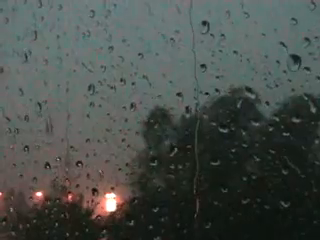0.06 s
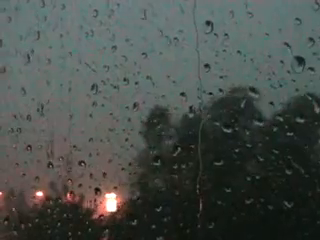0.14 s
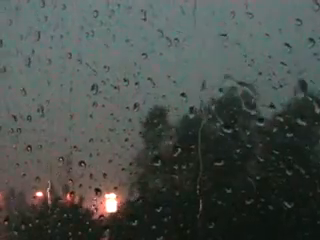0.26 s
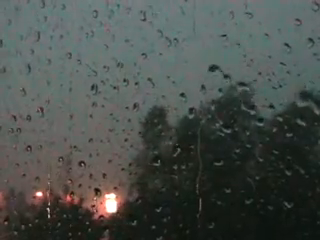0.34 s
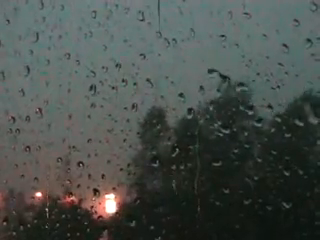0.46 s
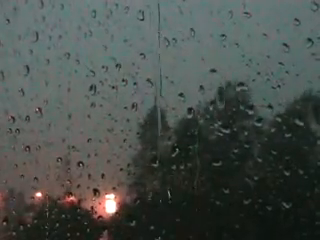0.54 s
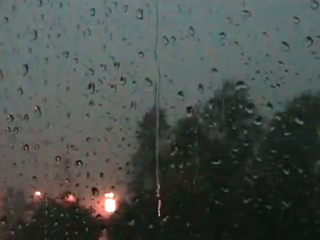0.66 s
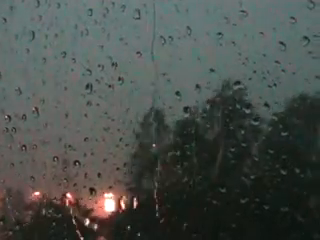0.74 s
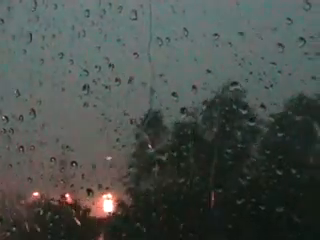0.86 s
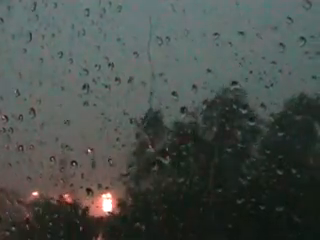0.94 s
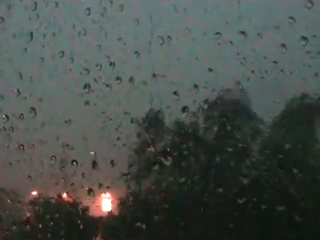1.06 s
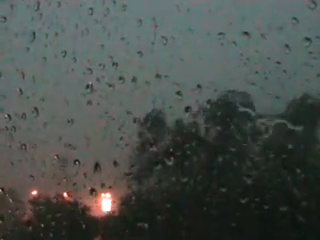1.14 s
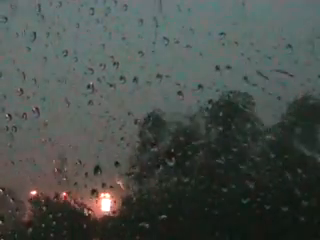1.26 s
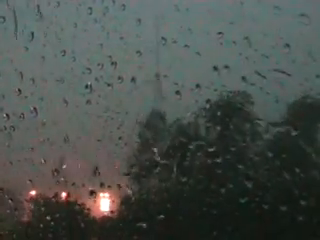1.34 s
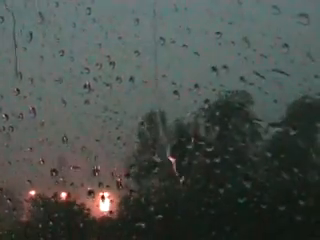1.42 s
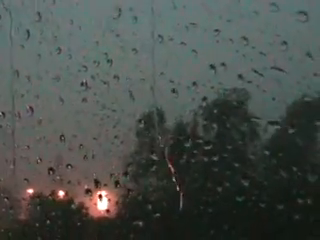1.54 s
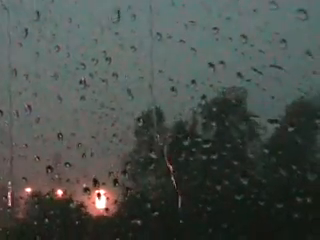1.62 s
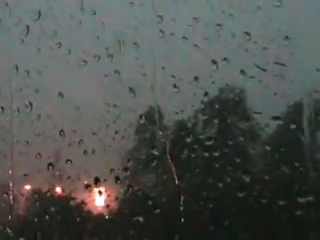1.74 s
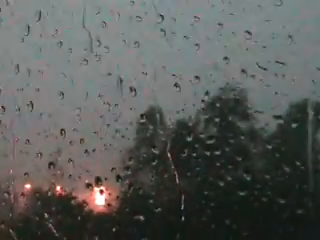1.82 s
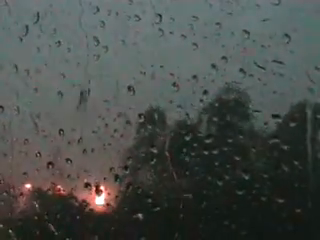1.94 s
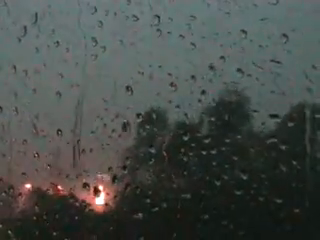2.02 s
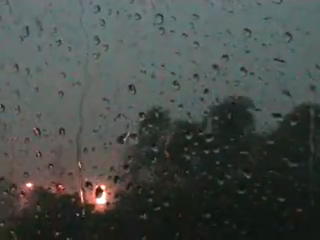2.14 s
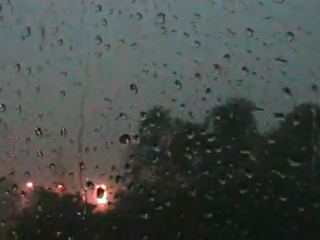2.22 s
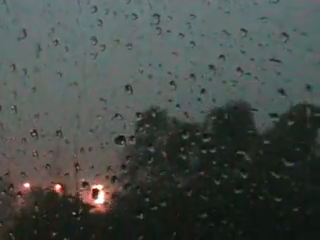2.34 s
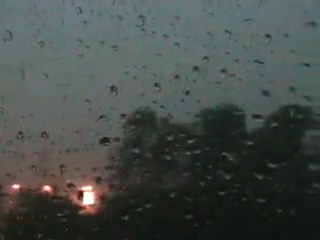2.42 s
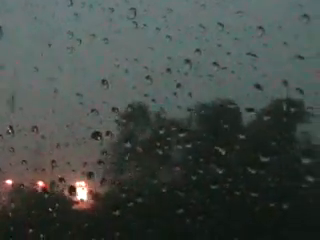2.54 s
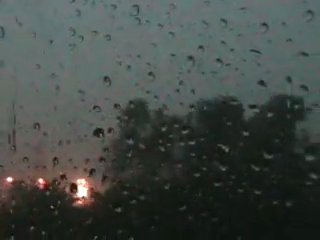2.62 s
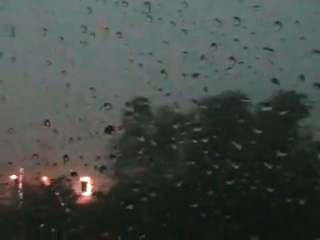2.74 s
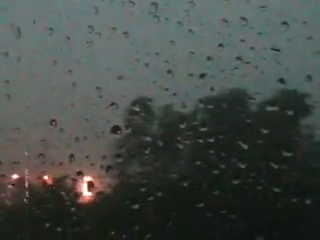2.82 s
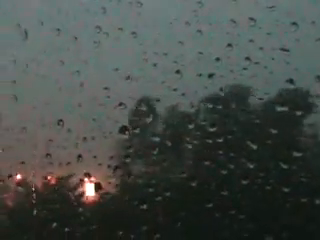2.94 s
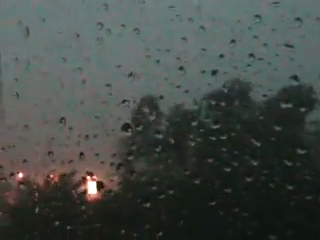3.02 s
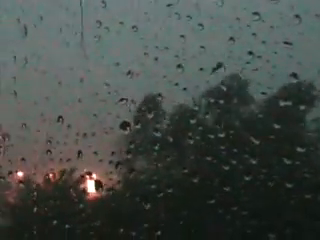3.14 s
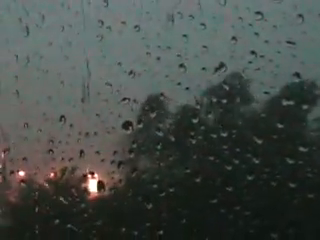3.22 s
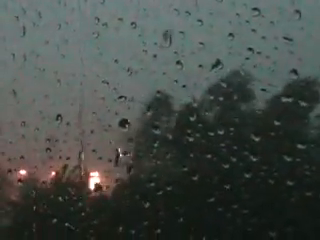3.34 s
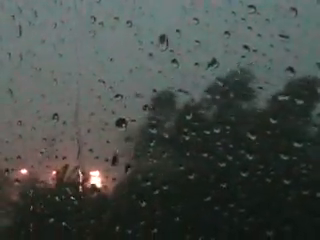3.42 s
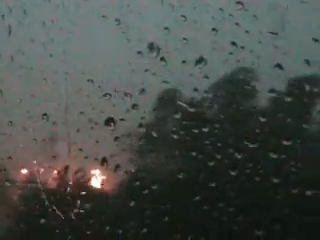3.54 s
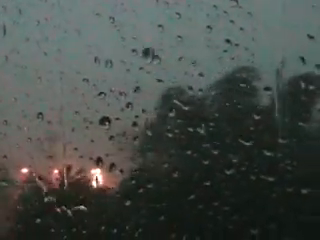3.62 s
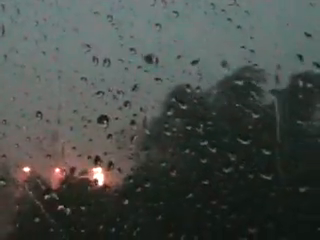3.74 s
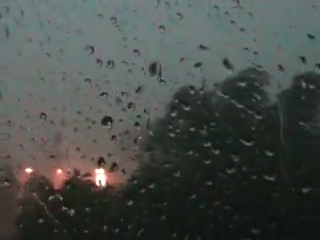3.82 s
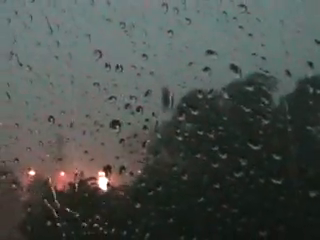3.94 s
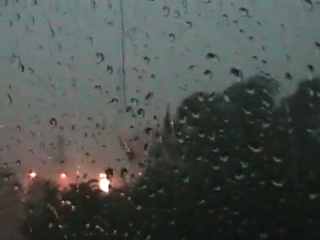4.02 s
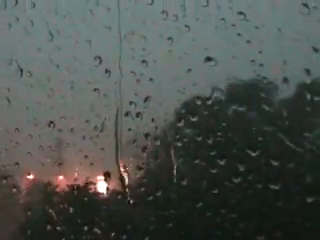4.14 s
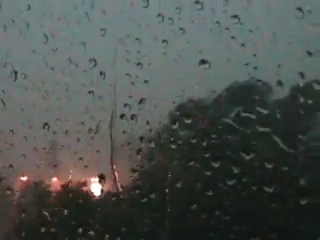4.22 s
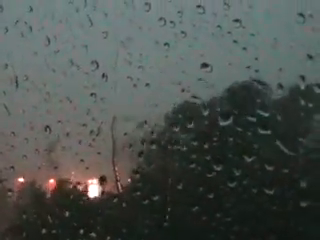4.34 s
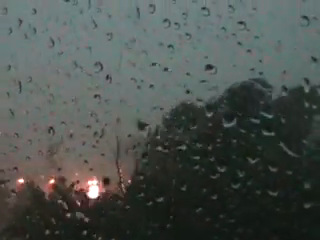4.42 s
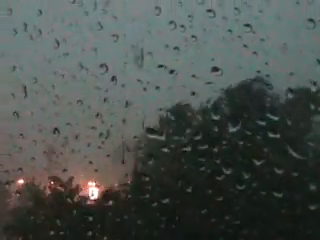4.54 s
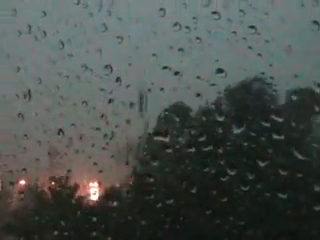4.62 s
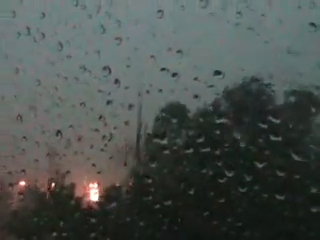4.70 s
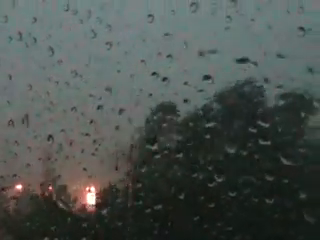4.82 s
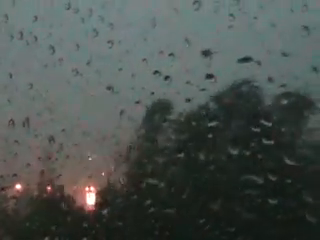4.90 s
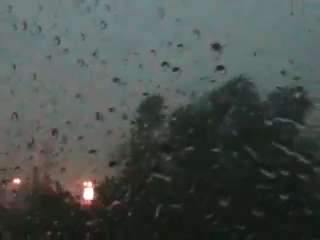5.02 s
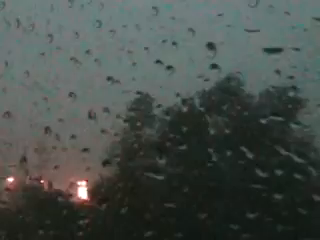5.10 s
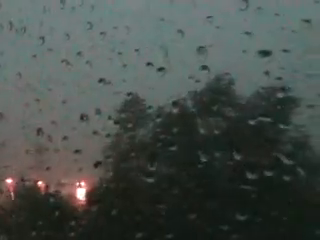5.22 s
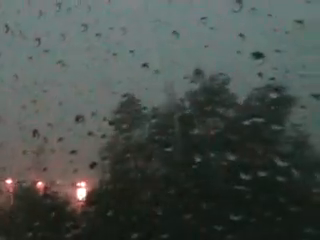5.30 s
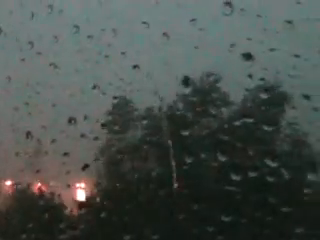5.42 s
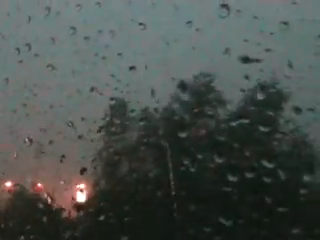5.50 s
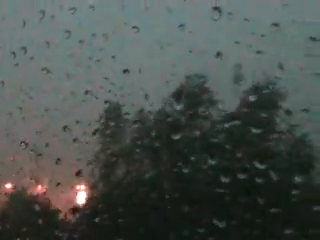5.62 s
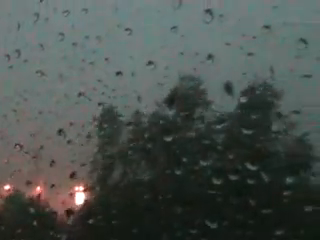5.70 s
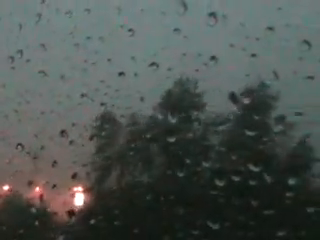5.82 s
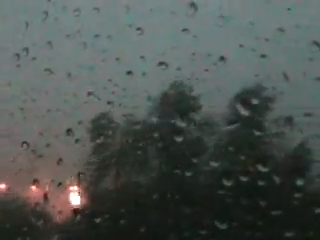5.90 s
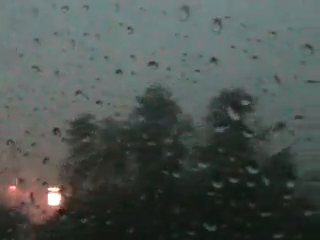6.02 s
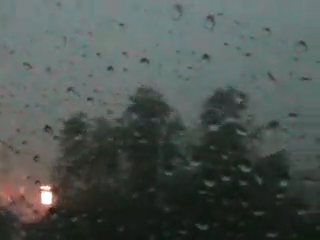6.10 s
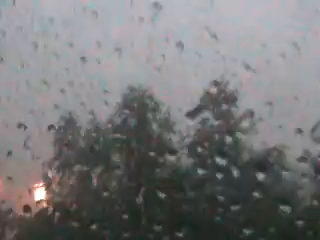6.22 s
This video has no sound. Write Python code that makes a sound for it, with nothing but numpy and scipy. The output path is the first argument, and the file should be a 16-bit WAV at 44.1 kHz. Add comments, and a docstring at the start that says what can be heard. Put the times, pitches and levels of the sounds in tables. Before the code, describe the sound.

Heard from inside a small room behind a closed window: a steady muffled gale roar with low rumble and boom. Rain starts thin, then gusts throw sheets of noisy patter on the glass with a few fat drops. After a brief lull, the squall swells and heavy drops click, knock and spatter hard on the pane, loudest at the very end.

```python
"""A gale with heavy rain, heard from behind a closed window.
From the start filtered noise roars through the walls and booms and hums in the small room.
The rain starts thin and soon fills in: gusts throw sheets of noisy patter at the glass, with a few fat drops.
Towards the end the squall grows, and fat drops smack on the pane: a click, a knock of ringing tones
and a bright burst of spatter."""
import sys
import numpy as np
from scipy import signal
from scipy.fft import rfft, irfft, next_fast_len
from scipy.io import wavfile
from scipy.ndimage import uniform_filter1d, map_coordinates

SR = 44100
rng = np.random.default_rng(int(sys.argv[2]) if len(sys.argv) > 2 else 0)


def transcribe(signal):
    """Save signal, clipped to [-1, 1], as a 16-bit WAV file at the path in sys.argv[1]."""
    frames = np.atleast_2d(signal).T
    limited = np.clip(frames, -1, 1)
    pcm = np.round(limited * 32767).astype(np.int16)
    wavfile.write(sys.argv[1], SR, pcm)


N = 276056  # length in samples

# Gusts that throw rain at the window.
# Each row: crest in seconds, rise in seconds, hold in seconds, strength in dB over the lulls.
GUSTS = [(0.71, 0.11, 0.12, 4.5), (1.193, 0.16, 0.075, 8.5), (1.33, 0.14, 0.07, 6), (1.5, 0.11, 0.025, 5.5),
         (1.776, 0.18, 0.18, 4.5), (2.136, .1, 0.12, 2), (2.687, 0.11, .02, 4), (2.99, 0.17, 0.14, 6),
         (3.23, .1, .04, 4.3), (3.505, 0.12, 0.094, 2.5), (4.374, 0.1, 0.074, 1), (4.865, 0.14, 0.21, 10.3),
         (5.055, 0.32, 0.31, 11), (5.495, 0.4, 0.098, 12), (5.909, 0.43, 0.07, 11.5),
         (6.19, 0.26, 0.075, 16.5)]
# Swell of the gale under the gusts. Each row: time in seconds, then levels of roar, hum and boom in dB.
GALE_LEVELS = [(0, -30.5, -37.5, -43.5), (.5, -30, -42, -36.5), (.8, -31.5, -37, -37.5),
               (1.0, -33, -40.5, -36.5), (1.15, -28, -37, -37.5), (1.37, -32, -37.5, -37.5),
               (1.65, -31, -41.5, -42.5), (2.05, -31.5, -42, -36), (2.4, -32, -40, -43),
               (2.52, -29, -41.5, -41), (2.8, -29.5, -43, -36), (3.05, -29, -39.5, -38.5),
               (3.45, -30, -38, -39.5), (3.78, -28.5, -38.5, -39), (4.25, -32, -40.5, -40.5),
               (4.68, -31, -40, -41.5), (4.9, -31, -34.5, -41), (5.0, -35, -29.5, -39),
               (5.45, -31, -37.5, -41.5), (5.72, -33, -40, -40), (5.85, -29, -42, -49),
               (6.05, -32.5, -35, -39), (6.15, -30, -31, -33), (6.25, -27, -38, -39)]
# Buffeting on the building. Each row: time in seconds, level in dB.
RUMBLE_LEVELS = [(0, -42.5), (1.2, -46.5), (2.3, -42), (3.1, -45), (4.5, -40), (5.1, -44), (5.8, -38),
                 (6.2, -41.5)]
# Tone colour of the roar, the rumble, the sheets of rain and the fine spray.
# Each row: frequency in Hz, relative level in dB.
ROAR_COLOUR = [(60, -48), (150, -9), (235, -5.5), (340, -2), (520, -2), (700, -5), (790, -5), (880, -2),
               (1200, -11), (1700, -15), (3000, -35), (8000, -64)]
RUMBLE_COLOUR = [(10, -9), (26, -3), (40, -11), (54, 4), (62, -7), (71, 3), (84, -7.5), (110, -4),
                 (200, -10.5), (500, -31), (1500, -37)]
SHEET_COLOUR = [(200, -35), (600, 6), (1000, 4.5), (1600, 0), (2300, 3), (2900, -2.5), (3800, -6.5),
                (5200, -16.5), (9000, -56)]
SPRAY_COLOUR = [(1500, -17), (3500, 0), (5000, -0.5), (5700, 0), (6600, 1.6), (8000, -2.5), (9400, -7),
                (10300, -10), (11200, -78)]
# Resonances of the walls, and of the room for its boom and its hum.
# Each row: frequency in Hz, width in Hz, relative level in dB.
WALL_MODES = [(439, 26, -4), (562.6, 32, -0.6), (695, 48, -3.5), (1067, 95, -13), (1296, 38, -9.5)]
BOOM_MODES = [(198.7, 15, 1.5), (239, 28, -1.5), (280, 24, 0.5), (344, 98, -7.5)]
HUM_MODES = [(125.5, 13, -10.5), (157.6, 7.9, -1)]
# Left-right likeness. Each row: frequency in Hz, likeness (1 same, 0 unrelated, -1 opposite).
ALIKE = [(130, 0.42), (260, 0.78), (550, 0.92), (1200, 0.91), (2400, 0.88), (5000, 0.85), (7500, 0.84),
         (10000, 0.022)]
RUMBLE_ALIKE = [(40, -0.9), (90, -0.42), (200, -0.85)]
# Fat drops on the pane. Each row: start in seconds, level in dB, centre of the splash in Hz,
# time in seconds for the splash to fall by 60 dB.
DROPS = [(.352, -46, 6000, 0.055), (.501, -44, 6460, .04), (.699, -42, 7000, 0.036), (.705, -40, 1880, .1),
         (.954, -41, 3600, 0.026), (2.686, -29, 2060, .08), (2.81, -44, 7400, .04),
         (2.834, -40, 4100, 0.037), (2.984, -41, 5870, 0.039), (3.041, -27, 2670, 0.035),
         (3.185, -39, 4000, 0.036), (3.512, -34.5, 2980, 0.059), (3.522, -45, 7000, 0.036),
         (3.803, -38.5, 3140, .04), (4.35, -45, 4000, .06), (4.849, -32, 5500, 0.026),
         (4.868, -43, 6000, .03), (4.912, -47, 7000, 0.027), (4.949, -33, 4600, .04),
         (5.123, -32, 6000, .06), (5.127, -22.5, 3000, 0.036), (5.272, -30.5, 3300, .04),
         (5.32, -28, 3300, 0.047), (5.392, -28, 4170, 0.044), (5.532, -32, 4600, 0.031),
         (5.58, -33, 2300, 0.036), (5.896, -26, 3500, 0.039), (6.1212, -30, 5140, .06),
         (6.2085, -16.5, 2500, 0.039), (6.226, -28, 1700, 0.043)]
# Hard smacks that shake the whole pane.
# Each row: start in seconds, then levels of knock, snap and spatter in dB.
SMACKS = [(5.123, -16, -18, -29), (5.896, -26, -24, -30), (6.1185, -17, -5, -40), (6.2068, -6, -12, -17.5)]
# Bright resonances that the spatter excites; their response is squared when used.
# Each row: frequency in Hz, width in Hz, relative level in dB (both before squaring).
SPATTER_MODES = [(5150, 550, 0), (7300, 700, -2), (8800, 650, -1.5), (10000, 500, -7)]
# Ringing tones of the pane.
# Each row: frequency in Hz, relative level in dB, time in seconds to fall by 60 dB.
PANE_MODES = [(227, -7, 0.27), (486, -5, 0.098), (716, 2, 0.019), (930, 5.5, 0.033), (1860, -5, 0.02),
              (2970, 2, 0.012)]

RELEASE_S = 0.46  # time constant with which a very faint gust ebbs
RELEASE_SHRINK_PER_DB = 0.24  # stronger gusts ebb sooner
# How far each layer follows the gusts, in dB per dB of gust
ROAR_GROWS, BOOM_GROWS, RUMBLE_GROWS, SHEET_GROWS, SPRAY_GROWS = 0.41, 0.64, 0.28, 1.092, 0.91
BOOM_LAG_S = 0.052  # the boom trails the rain
ROAR_WAVER_DB, BOOM_WAVER_DB, RUMBLE_WAVER_DB, FLURRY_DB = 0.8, 1.1, 1.6, 0.65  # random level changes
SHOWER_START_DB, SHOWER_BUILD_S = -2.5, 0.76  # the rain starts thin; time constant of filling in
SHEET_DB, SPRAY_DB = -40.5, -52.5  # levels in the lulls, once the rain has filled in
SPLASH_WIDTH = 1.0  # width of a splash resonance over its centre frequency, before squaring
SPATTER_HOLD_S, SPATTER_T60_S = 0.0021, 0.012  # burst length, then time to fall by 60 dB
SPATTER_ROOM_DB = -8  # room answer to the spatter
SPATTER_LEFT_DB = 2  # raises the left and lowers the right
SNAP_LOW_HZ, SNAP_HIGH_HZ = 1900, 6000  # band of the snap of a hard smack
KNOCK_LAG_S = 0.00195  # the frame gives way just after the glass is struck
TOP_HZ = 11100  # nothing is kept from here up


def amp(db):
    """Turn decibels into a gain."""
    return 10 ** (np.asarray(db) / 20)


def unit(x):
    """Scale to rms 1."""
    return x / np.sqrt(np.mean(x ** 2) + 1e-20)


def along(points, hz):
    """Read values between (Hz, value) points on a log frequency axis."""
    f, v = np.transpose(points)
    return np.interp(np.log(hz + 1), np.log(f + 1), v)


def curves(rows):
    """Give one value per sample for each column after the time."""
    s, *cols = np.transpose(rows)
    return [np.interp(np.arange(N) / SR, s, c) for c in cols]


def wobble(rate):
    """Draw a smooth random curve with this many knots a second."""
    return map_coordinates(rng.standard_normal(512), [np.arange(N) * rate / SR], mode="mirror")


def filtered(x, response):
    """Multiply the spectrum of x by a response that depends on frequency."""
    n = x.shape[-1]
    m = next_fast_len(n + 8192)  # spare room for the filter's tail
    return irfft(rfft(x, m) * response(np.fft.rfftfreq(m, 1 / SR)), m)[..., :n]


def resonance(f, centre, width):
    """Response of one damped vibration, strongest at its centre frequency."""
    return 1j * f * width / (centre ** 2 - f * f + 1j * f * width)


def peaks(modes, f):
    """Gain of several resonances whose powers add up."""
    return np.sqrt(sum(np.abs(amp(db) * resonance(f, hz, width)) ** 2 for hz, width, db in modes))


def spread(pair, colour, alike):
    """Turn two unrelated signals into a coloured, partly alike left and right of rms 1."""
    def mid_and_side(f):
        turn = np.arccos(np.clip(along(alike, f), -.98, .98)) / 2
        return colour(f) * np.array([np.cos(turn), np.sin(turn)])
    mid, side = filtered(pair, mid_and_side)
    return unit(np.array([mid + side, mid - side]))


def noise(length=N):
    """Two unrelated white noises."""
    return rng.standard_normal((2, length))


def gust():
    """Wind strength in dB over the lulls: each gust rises, holds and ebbs, and the strongest prevails."""
    t = np.arange(N) / SR
    strength = np.zeros(N)
    for s, rise_s, hold_s, db in GUSTS:
        release_s = RELEASE_S * np.exp(-RELEASE_SHRINK_PER_DB * db)
        rise = np.clip(1 + (t - s) / rise_s, 0, 1)
        ebb = np.exp(-np.maximum(t - s - hold_s, 0) / release_s)
        strength = np.maximum(strength, db * rise * ebb)
    return strength


def eddies(patchy_db):
    """Two unrelated noises whose bands swell and fade together in random patches."""
    z = signal.stft(noise(), nperseg=1024)[2]
    field = rng.standard_normal(z.shape[1:])
    field = uniform_filter1d(field, size=5, axis=0)  # smooth over frequency
    field = uniform_filter1d(field, size=11, axis=1)  # smooth over time
    return signal.istft(z * amp(patchy_db * unit(field)), nperseg=1024)[1][:, :N]


def room(modes, centre_hz, width_hz):
    """Noise that excites the room's resonances, narrowed by one broad resonance."""
    colour = lambda f: peaks(modes, f) * np.abs(resonance(f, centre_hz, width_hz))
    return spread(noise(), colour, ALIKE)


def wind(gust_db):
    """The gale, dulled by the walls, makes the room boom and hum over a rumble."""
    roar_db, hum_db, boom_db = curves(GALE_LEVELS)
    rumble_db, = curves(RUMBLE_LEVELS)
    t = np.arange(N) / SR

    def through_walls(f):
        ringing_walls = amp(4.5) * peaks(WALL_MODES, f) / (1 + (f / 1800) ** 4)
        return np.hypot(amp(along(ROAR_COLOUR, f)), ringing_walls)

    roar_db = roar_db + ROAR_GROWS * gust_db + ROAR_WAVER_DB * wobble(22.07)
    roar = amp(roar_db) * spread(eddies(patchy_db=1.0), through_walls, ALIKE)

    late_gust_db = np.interp(t - BOOM_LAG_S, t, gust_db)
    boom_db = boom_db + BOOM_GROWS * late_gust_db + BOOM_WAVER_DB * wobble(9)
    boom = amp(boom_db) * room(BOOM_MODES, centre_hz=260, width_hz=270)
    hum = amp(hum_db) * room(HUM_MODES, centre_hz=155, width_hz=124)

    rumble_db = rumble_db + RUMBLE_GROWS * gust_db + RUMBLE_WAVER_DB * wobble(8)
    rumble = amp(rumble_db) * spread(noise(), lambda f: amp(along(RUMBLE_COLOUR, f)), RUMBLE_ALIKE)
    return roar + boom + hum + rumble


def patter(rate, scatter_db, splash_t60):
    """Drops at random moments and of random size, each a very short burst of noise; rms 1."""
    sizes = amp(scatter_db * np.minimum(rng.standard_normal(N), 2))  # the largest are capped
    hits = (rng.random(N) < rate / SR) * sizes  # rate in drops a second
    t = np.arange(SR // 20) / SR
    power = signal.fftconvolve(hits ** 2, amp(-60 * t / splash_t60) ** 2)[:N]
    return unit(noise() * np.sqrt(np.abs(power)))


def rain(gust_db):
    """Gusts drum sheets of rain on the glass, and the finest drops tick and hiss above them."""
    shower_db = SHOWER_START_DB * np.exp(-np.arange(N) / SR / SHOWER_BUILD_S)
    clumps_db = FLURRY_DB * wobble(18)  # rain arrives in clumps
    drumming = noise() + amp(-3.5) * patter(rate=450, scatter_db=8.0, splash_t60=0.053)
    ticking = noise() + amp(-6.5) * patter(rate=180, scatter_db=12.0, splash_t60=0.044)

    sheet_db = SHEET_DB + shower_db + SHEET_GROWS * gust_db + clumps_db
    sheet = amp(sheet_db) * spread(drumming, lambda f: amp(along(SHEET_COLOUR, f)), ALIKE)
    spray_db = SPRAY_DB + shower_db + SPRAY_GROWS * gust_db + clumps_db
    spray = amp(spray_db) * spread(ticking, lambda f: amp(along(SPRAY_COLOUR, f)), ALIKE)
    return sheet + spray


def fat_drops():
    """Each big drop bursts in a short splash of noise, and the room answers faintly."""
    out, t = np.zeros((2, N + SR)), np.arange(SR // 8) / SR
    room_answer = amp(-23 - 60 * t / .12)
    for s, db, centre_hz, t60 in DROPS:
        def colour(f):
            splash = resonance(f, centre_hz, SPLASH_WIDTH * centre_hz) ** 2
            return splash / (1 + (f / 10300) ** 20)  # steep treble cut
        hiss = spread(noise(len(t)), colour, ALIKE)
        decay = np.hypot(amp(-60 * t / t60), room_answer)
        out[:, round(s * SR):][:, :len(t)] += amp(db) * hiss * decay
    return out[:, :N]


def spatter():
    """A hard smack shatters into spray that rings the glass brightly for an instant."""
    out, t = np.zeros((2, N + SR)), np.arange(SR // 8) / SR
    colour = lambda f: peaks(SPATTER_MODES, f) ** 2
    direct = amp(-60 * np.maximum(t - SPATTER_HOLD_S, 0) / SPATTER_T60_S)
    burst = np.hypot(direct, amp(SPATTER_ROOM_DB - 60 * t / .11))
    for s, _, _, db in SMACKS:
        hiss = spread(noise(len(t)), colour, ALIKE)
        out[:, round(s * SR):][:, :len(t)] += amp(db) * burst * hiss
    return out[:, :N] * amp([[SPATTER_LEFT_DB], [-SPATTER_LEFT_DB]])


def pane():
    """The hardest drops snap on the glass and make the window knock in its frame."""
    out, t = np.zeros(N + SR), np.arange(SR // 5) / SR
    below = signal.butter(8, SNAP_HIGH_HZ, fs=SR, output="sos")
    above = signal.butter(1, SNAP_LOW_HZ, "high", fs=SR, output="sos")
    snap = signal.sosfilt(np.vstack([below, above]), signal.unit_impulse(len(t)))  # one band-limited click
    for s, knock_db, snap_db, _ in SMACKS:
        ring = np.zeros(len(t))
        for hz, level_db, t60 in PANE_MODES:
            strike_db = level_db + rng.normal(0, 1.9)  # each strike excites the tones a little differently
            ring += amp(strike_db - 60 * t / t60) * np.sin(2 * np.pi * hz * t)
        out[round((s + KNOCK_LAG_S) * SR):][:len(t)] += amp(knock_db) * ring / np.abs(ring).max()
        out[round(s * SR):][:len(t)] += amp(snap_db) * snap / np.abs(snap).max()
    return out[:N]


def scene():
    """The same gusts drive wind and rain; the whole mix is a little louder on the right."""
    gust_db = gust()
    storm = wind(gust_db) + rain(gust_db)
    impacts = fat_drops() + spatter() + pane()
    return (storm + impacts) * amp([[-.35], [.35]])


def record(dry):
    """Cut off everything from the top frequency up."""
    return filtered(dry, lambda f: f < TOP_HZ)


dry = scene()
out = record(dry)
transcribe(out)
```